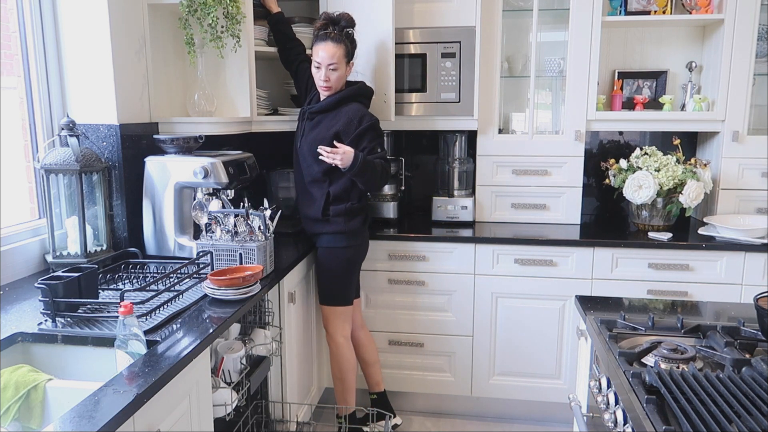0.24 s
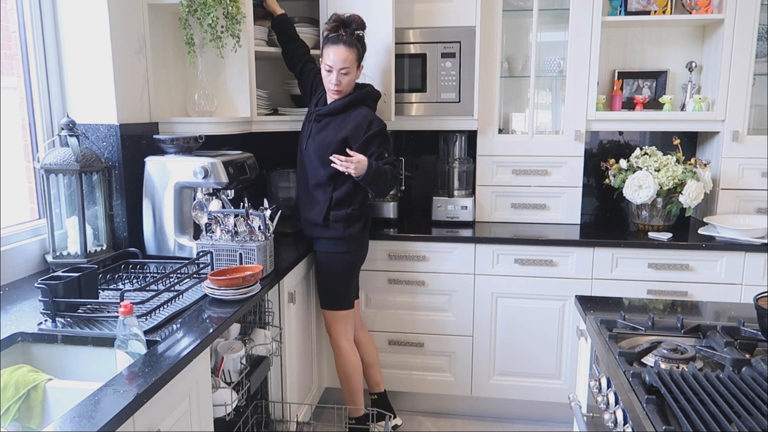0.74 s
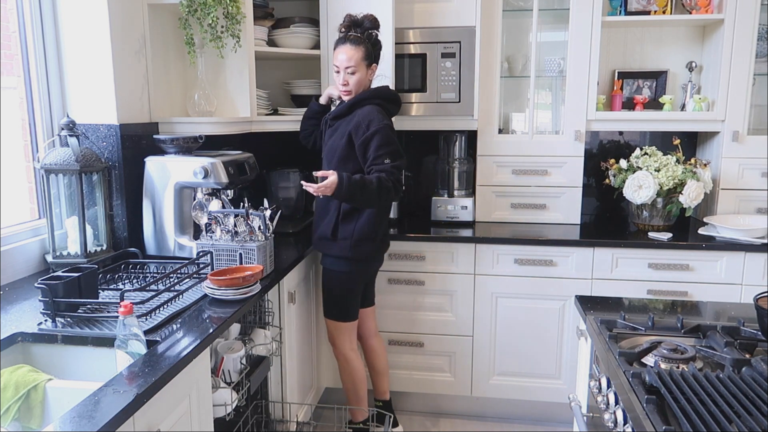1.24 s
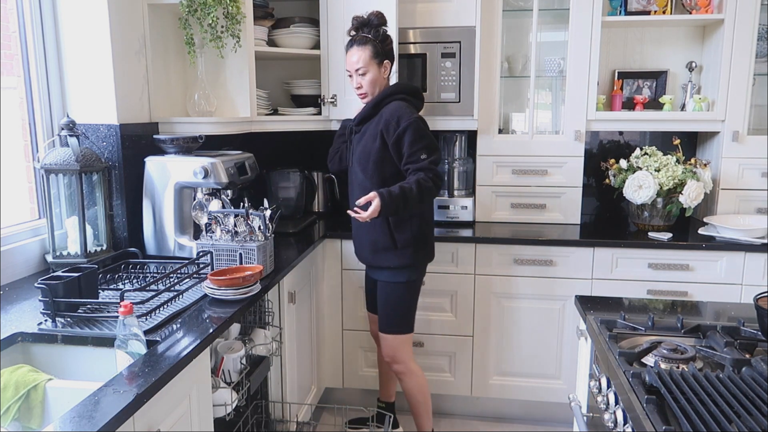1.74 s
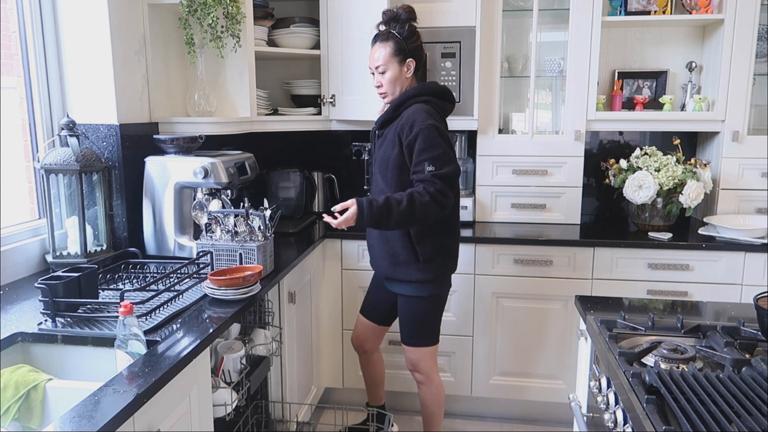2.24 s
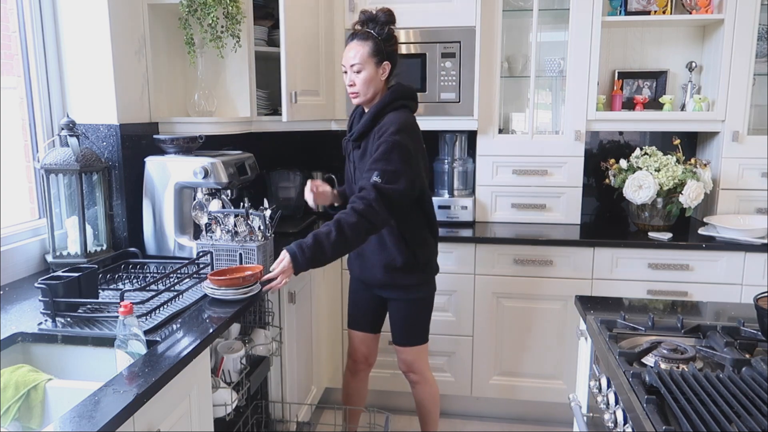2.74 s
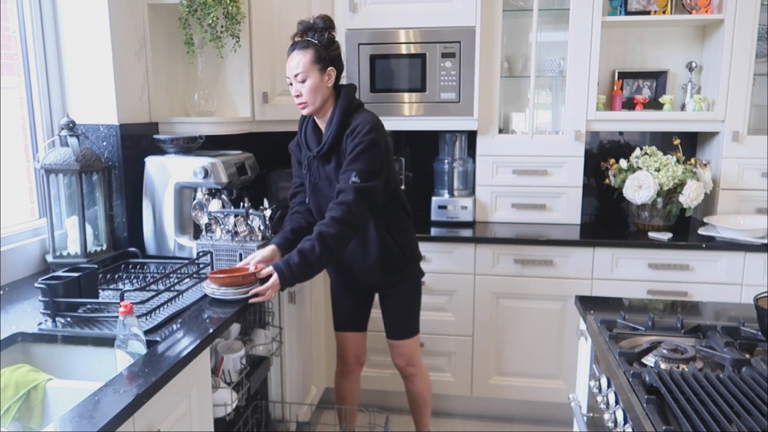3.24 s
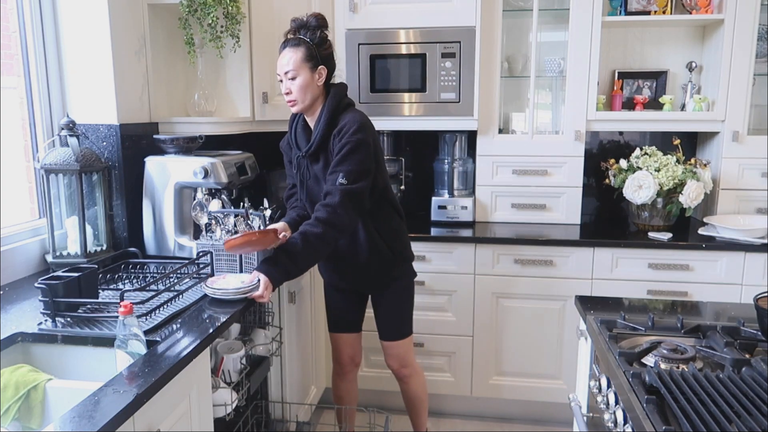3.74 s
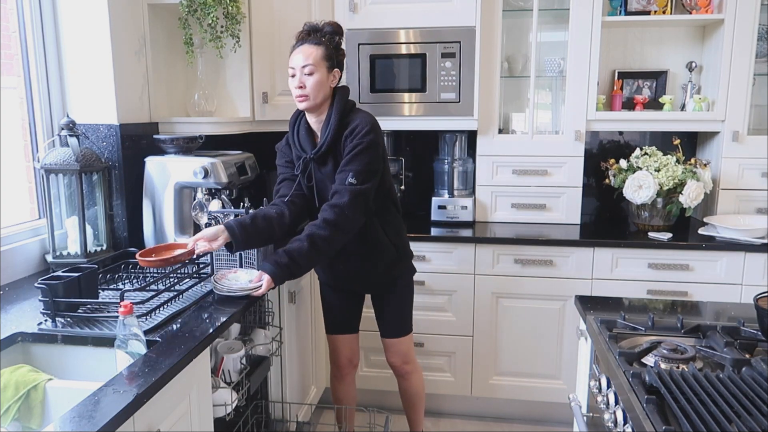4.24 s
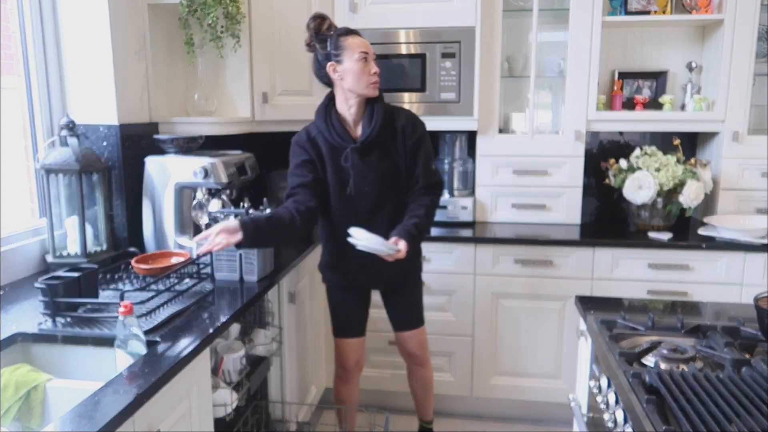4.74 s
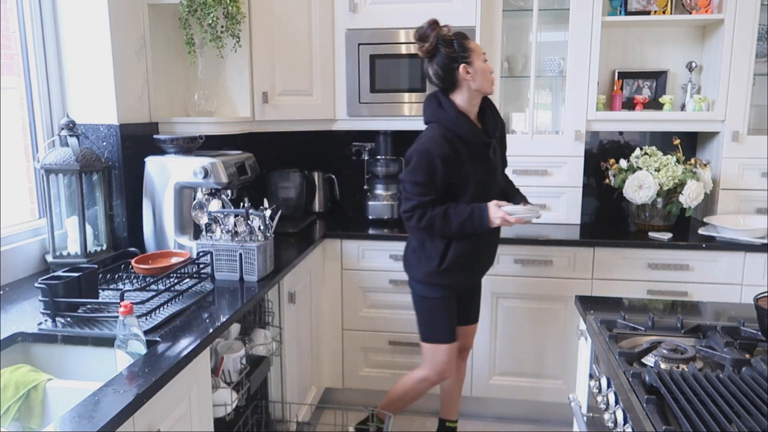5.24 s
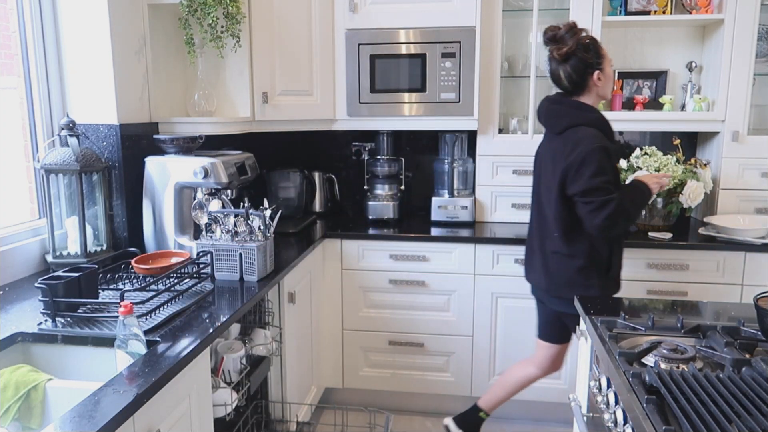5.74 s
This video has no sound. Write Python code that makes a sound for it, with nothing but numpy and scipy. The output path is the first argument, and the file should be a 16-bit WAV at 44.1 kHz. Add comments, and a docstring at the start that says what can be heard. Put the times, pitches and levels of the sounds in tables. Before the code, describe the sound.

Stereo microphone fixed in a kitchen: bright crockery clatter first, a pause, hollow wooden door knocks and a low counter thump, then a clay dish nudging and dragging over saucers before bouncing loudly in a rack. Lifted saucers clash, slide softly and jingle in short bursts with light footsteps. Short hard-room echo, quiet air and a wavering appliance hum.

```python
"""Crockery in a hard-walled kitchen

Dishes clash on a cupboard shelf, the door swings shut, a body bumps the counter, a clay dish is dragged off
saucers and set in a wire rack, and the saucers chatter as they are carried off. A hiss and a hum lie behind.
Each dish contact is a force (slide, strike, bounces) that clacks, rings modes and thuds in the support. Wood
uses the same model; door, clicks, bumps and hiss are filtered noise; the hum is a sum of sines."""
import sys
import numpy as np
from scipy import signal
from scipy.fft import rfft, irfft, next_fast_len
from scipy.io import wavfile
from scipy.ndimage import map_coordinates

SR = 44100
rng = np.random.default_rng(int(sys.argv[2]) if len(sys.argv) > 2 else 0)


def store_wav(level_fs):
    """Save 16-bit WAV to argv[1]."""
    pcm = np.round(np.clip(np.atleast_2d(level_fs), -1, 1) * 32767)
    wavfile.write(sys.argv[1], SR, pcm.T.astype(np.int16))


N = 264150
BLOW_S = np.arange(SR * 3 // 4) / SR  # time axis of one blow

# Edge: positive for a contact on the rim (more treble, shorter chatter), negative for a flat one.
CHATTER_HALVES_DB = 10  # this much more edge halves the chatter time
SLIP_SCATTER_DB = 6  # largest level offset of one slip of a rub
TOUCH_SCATTER_DB = 3  # rms; each point of contact brings out other partials
SHELF_DETUNE = 0.004  # relative pitch scatter; dishes that sit in a pile keep their pitch
SHELF_BOOM_DB = -32.5  # dishes are too light to make a cabinet boom
BOUNCE_GAP_S, GRIT_DB = 0.007, -10  # mean time between rim bounces; grinding between them
BEAT_HZ = 7  # mean beat rate of a split mode
SING_DB_PER_OCTAVE = 2  # a free rim favours its thin, high partials
NEAR_DB, NEAR_T60_S = 11, 0.04  # first echoes off the shelf or counter beside the dish
STEP_BOOM_DB, STEP_T60_S = -27, 0.28  # a soft shoe hardly stirs the deep bass
CLICK_DB, CLICK_PER_EDGE = -15, 0.2  # click in a knock; its growth with edge (dB per dB)

# Contact colour of pile and bowl. Each row: frequency in Hz, gain in dB.
BOWL_CLACK = [(88, -27), (150, -7), (350, -34.5), (505, -5.5), (636, -15.5), (866, 2.5), (1180, -6),
              (1350, -7), (1640, -2.5), (1910, -9), (2180, -5.5), (2550, 1), (2700, -17.5), (3340, 5.5),
              (3820, -22), (4540, -11.5), (5840, -34), (6300, -28.5), (10000, -43), (13100, -85.5),
              (15000, -72.5)]
# Contact colour of clay on saucers. Each row: frequency in Hz, gain in dB.
CLAY_CLACK = [(88, -43.5), (150, -12.5), (350, -9.5), (624, -8), (772, -15), (972, -3), (1200, -4.5),
              (1380, -1.5), (2230, -9), (2600, -9), (2810, -18.5), (3090, -10.5), (3470, -14),
              (3820, -14.5), (4210, -18), (9630, -41.5), (12100, -51), (12900, -74.5), (15000, -51)]
# Ringing of the wood. Each row: frequency in Hz, level in dB.
DOOR_MODES = [(540, -12), (760, 2), (1040, 6), (1250, 8.5), (1560, 2.5), (1760, 8), (2050, -12), (2450, 4)]
# Wooden knocks of the cupboard door. Each row: start in seconds, level in dB, edge in dB.
KNOCKS = [(1.695, -31.5, 7.5), (1.718, -35, -12), (1.732, -38, -3.5), (1.826, -33, 2), (1.843, -40.5, -3),
          (1.976, -51, -11), (2.43, -53, -5), (2.622, -37, 9.5), (2.959, -30, -4), (2.964, -30, -4)]


def amp(db):
    """Decibels to gain."""
    return 10 ** (np.asarray(db) / 20)


def unit(x):
    """x at rms 1."""
    return x / np.sqrt(np.mean(x ** 2) + 1e-20)


def blow(x):
    """x with the energy, per channel on average, of 0.01 s at rms 1."""
    return unit(x) * np.sqrt(SR / 100 / x.shape[-1])


def fade(t, t60_s):
    """Decay by 60 dB in t60_s."""
    return np.exp(-np.log(1000) * t / np.maximum(t60_s, 1e-3))


def along(points, hz):
    """Interpolate (Hz, value) points on a log frequency axis."""
    f, v = np.transpose(points)
    return np.interp(np.log(hz + 1), np.log(f + 1), v)


def above(hz, edge_hz):
    """Smooth step from 0 to 1 around edge_hz."""
    return hz ** 3 / (hz ** 3 + edge_hz ** 3)


def colour(x, level_db):
    """Causal minimum-phase filter whose gain in dB is level_db(Hz)."""
    m = 2 * next_fast_len(x.shape[-1] // 2 + 4096)
    gain = np.maximum(amp(level_db(np.fft.rfftfreq(m, 1 / SR))), 1e-6)
    cepstrum = irfft(np.log(gain), m)
    # fold the cepstrum to positive time
    cepstrum[1:m // 2] *= 2
    cepstrum[m // 2 + 1:] = 0
    return irfft(rfft(x, m) * np.exp(rfft(cepstrum)), m)[..., :x.shape[-1]]


def add(track, start_s, x):
    """Mix x into the track from start_s on."""
    start = round(start_s * SR)
    x = x[..., max(-start, 0):N - start]
    track[:, max(start, 0):][:, :x.shape[-1]] += x


def cupboard_pile():
    """The bowl grazes the pile on the shelf and grinds round in it; the glazed dishes ring."""
    # Grazes. Each row: start in seconds, level in dB, edge in dB.
    grazes = [(0.001, -16, 3.5), (0.011, -25, -2), (0.03, -16, -2.5), (0.159, -18.5, 1.5)]
    # Path of the grinding. Each row: time in seconds, level in dB, edge in dB.
    rub = [(0.07, -25.5, -8), (0.14, -26, -12.5), (0.19, -22, -1)]
    # Ringing. Each row: frequency in Hz, level in dB.
    modes = [(877.5, -44), (1007, -41), (1093, -43.5), (1351, -50.5), (1567, -51), (1852, -38), (1943, -36),
             (2428, -40.5), (2503, -46.5), (2896, -47.5), (3009, -38.5), (3332, -41), (3505, -58),
             (4522, -51), (5130, -50), (5545, -66), (6142, -60), (7041, -64)]
    return contacts(grazes + slips(rub, count=5), modes, BOWL_CLACK,
                    ring_db=4, ring_t60_s=0.089, detune=SHELF_DETUNE,
                    bounce_db=3.5, chatter_s=0.096, slide_db=-8, thinning=0.54, thud_db=-26,
                    early_db=1, direct_db=-0.5, sing_db=-3.5, sing_t60_s=0.35)


def bowl():
    """The bowl drops home, rings and settles."""
    # Drops. Each row: start in seconds, level in dB, edge in dB.
    drops = [(0.203, -14.5, -11.5), (0.211, -11, 2), (0.219, -15, 0.5), (0.24, -19.5, -7.5)]
    # Ringing. Each row: frequency in Hz, level in dB.
    modes = [(877.5, -40), (942.1, -42), (1001, -46), (1319, -31.5), (1567, -42), (1723, -52.5),
             (1866, -43), (2078, -50), (2455, -43), (2498, -43), (2912, -39), (3060, -57), (3284, -45.5),
             (3553, -42.5), (3817, -57), (4517, -52.5), (6228, -63), (6350, -61.5)]
    return contacts(drops, modes, BOWL_CLACK, ring_db=-2, ring_t60_s=0.046, detune=SHELF_DETUNE,
                    bounce_db=3, chatter_s=0.065, slide_db=-5, thinning=0.5, thud_db=-29.5,
                    early_db=6.5, direct_db=-8, sing_db=-5.5, sing_t60_s=0.65)


def plate():
    """A plate grazes its pile, touches down, drops flat and rings."""
    # Touches. Each row: start in seconds, level in dB, edge in dB.
    touches = [(0.736, -34.5, -13), (0.76, -20, -5), (0.77, -14.5, -5.5), (0.819, -8.5, 0),
               (0.828, -16.5, -1), (0.854, -20.5, -2.5)]
    # Ringing. Each row: frequency in Hz, level in dB.
    modes = [(829, -44), (1136, -47), (1314, -42), (1707, -48), (1873, -41), (2186, -42), (2225, -46),
             (2422, -47), (2498, -39), (2977, -43), (3106, -43), (3348, -51), (3510, -47), (4495, -52),
             (4764, -49.5), (5076, -53), (5582, -47.5), (6169, -52), (6352, -50.5), (7041, -54),
             (7105, -60)]
    # Contact colour. Each row: frequency in Hz, gain in dB.
    clack = [(88, -39), (150, -21), (343, -23), (433, -11.5), (687, -14.5), (883, -11), (1010, -13.5),
             (1320, -2.5), (1640, -8), (1840, -1), (2060, -7.5), (2550, 1.5), (2810, -13), (3090, 3.5),
             (4050, -19), (5000, -10.5), (5840, -33), (6300, -24), (9820, -42), (13400, -70), (15000, -56)]
    return contacts(touches, modes, clack, ring_db=-13, ring_t60_s=0.2, detune=SHELF_DETUNE,
                    bounce_db=4, chatter_s=0.03, slide_db=-15.5, thinning=1.7, thud_db=-23.5,
                    early_db=10, direct_db=-8, sing_db=-7, sing_t60_s=0.6)


def clay_tipping():
    """The clay dish tips up on its foot and nudges the saucers under it, which ring."""
    # Nudges. Each row: start in seconds, level in dB, edge in dB.
    nudges = [(3.328, -27, -5.5), (3.42, -17.5, -6), (3.427, -21, -6), (3.452, -15, -9),
              (3.466, -16.5, 0.5), (3.493, -15.5, -9), (3.497, -12, -3.5)]
    # Ringing of the saucers. Each row: frequency in Hz, level in dB.
    modes = [(1028, -30), (1200, -39), (1340, -24.5), (1464, -25.5), (1660, -28.5), (2099, -25),
             (2250, -39), (2492, -30), (3117, -34), (4081, -35.5), (4350, -43)]
    return contacts(nudges, modes, CLAY_CLACK, ring_db=1, ring_t60_s=0.11, detune=0.0091,
                    bounce_db=0, chatter_s=0.04, slide_db=-7, thinning=0.77, thud_db=-20.5,
                    early_db=8.5, direct_db=-16, sing_db=-7.5, sing_t60_s=0.17)


def clay_off_stack():
    """The clay dish drops onto its rim, rattles on the saucers and is dragged clear in small slips."""
    # Knocks on the saucers. Each row: start in seconds, level in dB, edge in dB.
    hits = [(3.505, -11, -1.5), (3.514, -17, -1), (3.528, -12.5, 0), (3.539, -15, 14.5), (3.549, -28.5, 10),
            (3.591, -17.5, 4.5), (3.603, -22.5, 5.5), (3.617, -22, 9.5), (3.659, -24, 3), (3.764, -25.5, 0),
            (3.841, -39, -3), (3.881, -27, -4.5), (3.897, -29, -4.5), (3.942, -29, -7)]
    # Path of the drag. Each row: time in seconds, level in dB, edge in dB.
    rub = [(3.63, -20, 4), (3.7, -21, -3), (3.77, -40, 2), (3.83, -31.5, -13), (3.89, -29.5, -1.5),
           (4.0, -31, 3)]
    # Ringing. Each row: frequency in Hz, level in dB.
    modes = [(1012, -35), (1324, -39), (1389, -35), (1529, -38.5), (1669, -37), (1906, -35.5), (2105, -40),
             (2353, -39), (2654, -36.5), (3036, -38.5), (3219, -42), (3736, -46.5), (3844, -44),
             (5000, -50), (5464, -49), (5800, -54.5), (7250, -60), (9168, -60.5)]
    return contacts(hits + slips(rub, count=10), modes, CLAY_CLACK,
                    ring_db=-2, ring_t60_s=0.11, detune=0.008,
                    bounce_db=0, chatter_s=0.055, slide_db=-13, thinning=0.6, thud_db=-17.5,
                    early_db=4, direct_db=-4, sing_db=-12, sing_t60_s=0.16)


def clay_in_rack():
    """The clay dish lands in the wire rack with bouncing, ringing blows."""
    # Landings. Each row: start in seconds, level in dB, edge in dB.
    landings = [(4.026, -18.5, -1), (4.066, -17, -5.5), (4.076, -13, -1.5), (4.094, -17.5, -10.5),
                (4.11, -8, 2), (4.13, -13, 6.5), (4.155, -13, 1.5), (4.204, -26, -2.5)]
    # Ringing. Each row: frequency in Hz, level in dB.
    modes = [(1109, -37.5), (1900, -33.5), (2083, -38.5), (2492, -28.5), (3079, -25.5), (3198, -41),
             (3478, -32), (4549, -46), (4732, -30), (5464, -37.5), (5556, -45), (6433, -53), (7348, -48.5),
             (9286, -50.5)]
    # Contact colour. Each row: frequency in Hz, gain in dB.
    clack = [(88, -55), (150, -25), (212, -31.5), (312, -13), (401, -21.5), (701, -12.5), (772, -13),
             (1070, 5.5), (1320, -2), (1670, 1.5), (2750, -10), (3090, -5.5), (4290, -5), (4720, -10),
             (9090, -27.5), (10000, -36), (12100, -27), (13600, -62.5), (15000, -43.5)]
    return contacts(landings, modes, clack, ring_db=-5, ring_t60_s=0.07, detune=0.0075,
                    bounce_db=3, chatter_s=0.075, slide_db=-11, thinning=0.95, thud_db=-36.5,
                    early_db=4.5, direct_db=-12, sing_db=-14.5, sing_t60_s=0.41)


def saucers_lifted():
    """The saucers slide together in the hand as they are lifted."""
    # Clashes. Each row: start in seconds, level in dB, edge in dB.
    clashes = [(4.302, -20.5, -2), (4.313, -11.5, 0.5), (4.338, -11.5, 6), (4.351, -18, -3.5),
               (4.539, -34, -19)]
    # Ringing. Each row: frequency in Hz, level in dB.
    modes = [(1335, -39.5), (1696, -35.5), (1997, -42), (2907, -54.5), (3020, -41), (3741, -40.5),
             (4204, -50.5), (4339, -60), (5076, -52), (7079, -55.5), (8349, -59), (8829, -85.5)]
    # Contact colour. Each row: frequency in Hz, gain in dB.
    clack = [(88, -79), (150, -40), (312, -37.5), (525, -22.5), (833, -10.5), (954, -8.5), (1540, -8),
             (1950, -1), (2550, -11.5), (2970, -3.5), (3470, -11.5), (3820, -9), (6680, -26), (7210, -26.5),
             (11900, -41), (13100, -59.5), (15000, -67)]
    return contacts(clashes, modes, clack, ring_db=-12.5, ring_t60_s=0.11, detune=0.0068,
                    bounce_db=1.5, chatter_s=0.03, slide_db=-13, thinning=0.88, thud_db=-55,
                    early_db=5.5, direct_db=-10, sing_db=-6.5, sing_t60_s=0.49)


def saucers_sliding():
    """Saucers slide and chatter softly in the hand."""
    # Slides. Each row: start in seconds, level in dB, edge in dB.
    slides = [(4.709, -38.5, 7), (4.75, -32.5, -1.5), (4.785, -36.5, 8.5), (4.8, -37, 10.5),
              (4.822, -29, -1.5), (4.871, -35, -6), (4.92, -41, -15), (5.07, -46.5, -25)]
    # Ringing. Each row: frequency in Hz, level in dB.
    modes = [(678, -11), (861, 5), (1039, -4.5), (1771, 6.5), (2099, -0.5), (3020, -5.5), (3117, 2.5),
             (3332, -0.5), (4075, -9.5), (4199, -7), (4377, -4.5), (5426, -9), (6670, -25)]
    # Contact colour. Each row: frequency in Hz, gain in dB.
    clack = [(150, -76), (250, -37), (675, 3.5), (1560, -4), (1790, -8), (2480, -9.5), (3050, -3),
             (4400, -11), (4900, -18), (6700, -29), (10100, -37), (15000, -66.5)]
    return contacts(slides, modes, clack, ring_db=1, ring_t60_s=0.11, detune=0.0051,
                    bounce_db=0.5, chatter_s=0.23, slide_db=-2.5, thinning=0.16, thud_db=-32,
                    early_db=5, direct_db=-8.5, sing_db=-15.5, sing_t60_s=0.55)


def saucers_carried():
    """The saucers jump and chatter in the hand as they are carried off."""
    # Jumps. Each row: start in seconds, level in dB, edge in dB.
    jumps = [(5.328, -47, -1), (5.379, -36, -5), (5.394, -26, 1.5), (5.406, -26, -2), (5.436, -27, 6),
             (5.638, -53, -12), (5.665, -24, 3.5), (5.696, -20.5, 1), (5.714, -26.5, -5),
             (5.742, -28.5, -6), (5.81, -32.5, -2), (5.913, -38, 0.5)]
    # Ringing. Each row: frequency in Hz, level in dB.
    modes = [(1109, -55.5), (1190, -54.5), (1427, -52.5), (1545, -56), (1916, -47.5), (2040, -45.5),
             (2175, -49), (2245, -54), (2503, -46), (3365, -62.5), (4021, -61), (4856, -65.5), (5755, -65)]
    # Contact colour. Each row: frequency in Hz, gain in dB.
    clack = [(88, -71), (150, -37), (378, -30), (459, -17.5), (1160, -3), (1770, -9), (1910, -9.5),
             (2500, -4.5), (2700, -14), (3400, -10), (3600, -15), (5840, -25), (6810, -28.5), (12100, -50),
             (15000, -77.5)]
    return contacts(jumps, modes, clack, ring_db=-1, ring_t60_s=0.065, detune=0.014,
                    bounce_db=4, chatter_s=0.054, slide_db=-10, thinning=1.2, thud_db=-49,
                    early_db=6, direct_db=-12.5, sing_db=-12, sing_t60_s=0.4)


def contacts(rows, modes, clack, ring_db, ring_t60_s, detune, bounce_db, chatter_s, slide_db, thinning,
             thud_db, early_db, direct_db, sing_db, sing_t60_s):
    """Slide, strike and bounces force a clack, modes and a support thud; the freed rim sings on."""
    track = np.zeros((2, N))
    lead = round(.03 * SR)
    t = BLOW_S[:SR // 3] - BLOW_S[lead]  # time from the strike
    ring_s = BLOW_S[:SR // 6]
    # each mode is a close pair
    hz, mode_db = np.transpose(np.repeat(modes, 2, axis=0))[:, :, None]
    # high modes die sooner; ring_t60_s holds at 2 kHz
    t60_s = ring_t60_s * np.sqrt(2000 / hz)
    decays = amp(mode_db) * fade(ring_s, t60_s) / np.sqrt(t60_s)
    free = partials(modes, sing_t60_s)
    for start_s, db, edge_db in rows:
        # a flat contact chatters longer than one on the rim
        chatter = chatter_s * 2 ** (-edge_db / CHATTER_HALVES_DB)
        slide = amp(slide_db) * grit((t < 0) * (t - t[0]))
        strike = blow(1. * (t == 0))
        force = slide + strike + amp(bounce_db) * rattle(t, chatter)

        # pitch shifts with where the dish is held and touched
        pitch = hz * (1 + detune * rng.standard_normal(hz.shape))
        waves = np.sin((2 * np.pi * pitch * ring_s).astype("f"))
        ring = rng.choice([-1, 1], len(hz)) @ (decays * waves)
        rung = blow(signal.fftconvolve(force, ring)[:len(t)])
        clacked = blow(colour(force, lambda f: along(clack, f)))
        hit = blow(clacked + amp(ring_db) * rung)
        hit = hit + amp(thud_db) * blow(cabinet(force, SHELF_BOOM_DB))

        # the more edge, the more treble and (by thinning) the less body
        tilt = lambda f: edge_db * (above(f, 4100) - thinning * (1 - above(f, 720)))
        heard = kitchen(colour(hit, tilt), direct_db, early_db)
        add(track, start_s - lead / SR, amp(db) * heard)

        # separate random phases in mid and side
        touch_db = TOUCH_SCATTER_DB * rng.standard_normal(len(free))
        phases = np.exp(2j * np.pi * rng.uniform(0, 1, (2, len(free))))
        struck = amp(tilt(hz[::2, 0]) + touch_db) * phases
        add(track, start_s, amp(db + sing_db) * blow((struck @ free).real))
    return track


def slips(rub, count):
    """A rub sticks and slips at uneven moments; each slip is a small blow."""
    s, db, edge_db = np.transpose(rub)
    scatter = rng.uniform(-1, 1, (count, 2))
    place = (np.arange(count) + .5 + .5 * scatter[:, 0]) / count
    times = s[0] + (s[-1] - s[0]) * place
    levels_db = np.interp(times, s, db) + SLIP_SCATTER_DB * scatter[:, 1]
    return list(zip(times, levels_db, np.interp(times, s, edge_db)))


def grit(envelope):
    """Spiky contact force of rough surfaces under an envelope."""
    noise = rng.standard_normal(len(envelope))
    return blow(noise * abs(noise) * envelope)


def rattle(t, chatter_s, count=24):
    """A rim bounces in separate, dying taps, with a little grinding between them."""
    times = np.cumsum(BOUNCE_GAP_S * rng.uniform(.4, 1.6, count))
    signs = rng.choice([-1., 1.], count)
    taps = np.bincount(np.searchsorted(t, times), signs, len(t))[:len(t)]
    dying = (t > 0) * fade(abs(t), chatter_s)
    return blow(blow(taps * dying) + amp(GRIT_DB) * grit(dying))


def partials(modes, t60_s):
    """Lasting ring of a free rim, a complex row per mode; each beats slowly and high ones die sooner."""
    hz, db = np.transpose(modes)[:, :, None]
    chance = rng.uniform(0, 1, (len(hz), 2))
    beat_cycles = BEAT_HZ * (.5 + chance[:, :1]) * BLOW_S + chance[:, 1:]
    beat = 1 + .5 * np.exp(2j * np.pi * beat_cycles)
    life_s = t60_s * (2000 / hz) ** .2
    level = amp(db + SING_DB_PER_OCTAVE * np.log2(hz / hz[0]))
    envelope = fade(BLOW_S, life_s) * (1 - fade(BLOW_S, 0.03))  # soft onset
    return level * envelope * beat * np.exp(2j * np.pi * hz * BLOW_S)


def cabinet(push, boom_db):
    """Dull answer of the cabinets to a push, boom_db setting the deep bass."""
    # Colour of a bump. Each row: frequency in Hz, gain in dB.
    bump_colour = [(20, -44), (38, -17), (57, 16.5), (80, 5.5), (110, -3), (140, 5), (180, -8), (245, -8.5),
                   (330, -12), (450, -16.5), (800, -24), (1500, -75.5)]
    return colour(push, lambda f: along(bump_colour, f) + boom_db * (1 - above(f, 120)))


def kitchen(x, direct_db, early_db, early_t60_s=0.24):
    """Mid and side of a blow: direct sound, near surfaces, dense cabinet echoes and the room's tail."""
    # Reverberation. Each row: frequency in Hz, T60 in seconds.
    room_t60 = [(60, 0.34), (200, 0.87), (600, 0.98), (1400, 0.9), (3500, 0.75), (7000, 0.67),
                (13000, 0.044)]
    hz, t, z = signal.stft(rng.standard_normal((2, len(BLOW_S))), SR, nperseg=256)
    near = amp(NEAR_DB) * fade(t, NEAR_T60_S)
    echoes = np.hypot(near, amp(early_db) * fade(t, early_t60_s))
    decay = np.hypot(fade(t, along(room_t60, hz)[:, None]), echoes)
    paths = signal.istft(z * decay, SR, nperseg=256)[1][:, :len(BLOW_S)]
    paths /= np.linalg.norm(paths[0])
    paths[0, 0] += amp(direct_db)  # direct sound in the mid only
    return signal.fftconvolve(x[None], paths, axes=1)[:, :len(BLOW_S)]


def door_knocks():
    """Short, hollow wooden knocks of the cupboard door."""
    # Contact colour. Each row: frequency in Hz, gain in dB.
    clack = [(71, -34), (120, -9), (387, -8), (569, -1), (629, -1.5), (961, -6), (1020, -9), (1130, -1.5),
             (1690, -2), (5350, -19), (15000, -66)]
    return contacts(KNOCKS, DOOR_MODES, clack, ring_db=-2, ring_t60_s=0.022, detune=0.024,
                    bounce_db=0, chatter_s=0.029, slide_db=-18, thinning=0.42, thud_db=-31,
                    early_db=6, direct_db=-8.5, sing_db=-13, sing_t60_s=0.25)


def counter_jolts():
    """The body meets the counter's edge and the wooden fronts clack."""
    # Jolts. Each row: start in seconds, level in dB, edge in dB.
    jolts = [(3.137, -25, 7), (3.145, -30.5, 14.5), (3.162, -25, -5.5), (3.21, -29, 0)]
    # Contact colour. Each row: frequency in Hz, gain in dB.
    clack = [(150, -41.5), (250, -4), (433, -21.5), (609, -6), (1110, -9.5), (1270, -14.5), (2060, -10),
             (10300, -52), (15000, -106)]
    return contacts(jolts, DOOR_MODES, clack, ring_db=-21, ring_t60_s=0.025, detune=0.021,
                    bounce_db=6, chatter_s=0.041, slide_db=-26.5, thinning=0.34, thud_db=-22,
                    early_db=-2.5, direct_db=-10.5, sing_db=-9.5, sing_t60_s=0.3)


def door_panel(t60_s=0.012):
    """The door panel thuds, dull and hollow, as it is pushed, shuts and rebounds."""
    # Thuds. Each row: start in seconds, level in dB.
    shuts = [(1.828, -55), (1.866, -51), (2.966, -30.5), (2.992, -31.5)]
    # Colour of the panel. Each row: frequency in Hz, gain in dB.
    panel = [(200, -38.5), (400, -14.5), (540, 15.5), (640, -8), (850, -2), (2000, -55.5)]
    track = np.zeros((2, N))
    for start_s, db in shuts:
        push = rng.standard_normal(len(BLOW_S)) * fade(BLOW_S, t60_s)
        thud = colour(push, lambda f: along(panel, f))
        add(track, start_s, amp(db) * blow(kitchen(thud, direct_db=0.5, early_db=20.5)))
    return track


def clicks():
    """Every door knock brings a click; hinge, counter and gripped dish tick on notes of their own."""
    # Hinge spring as the door folds in. Each row: start in seconds, level in dB.
    hinge = [(2.622, -46.5), (2.653, -37.5), (2.692, -38)]
    # Crack of the jolted counter front. Each row: start in seconds, level in dB.
    crack = [(3.1445, -30)]
    # Click as the clay dish is gripped. Each row: start in seconds, level in dB.
    grip = [(3.3695, -41.5)]
    snaps = [(s, db + CLICK_DB + CLICK_PER_EDGE * edge_db) for s, db, edge_db in KNOCKS]
    return (ticks(snaps, t60_s=0.033, centre_hz=1900, octaves=0.3, direct_db=-3.5)
            + ticks(hinge, t60_s=0.02, centre_hz=2070, octaves=0.19, direct_db=-4)
            + ticks(crack, t60_s=0.026, centre_hz=2580, octaves=0.36, direct_db=4.5)
            + ticks(grip, t60_s=0.012, centre_hz=4500, octaves=0.3, direct_db=-9.5))


def ticks(rows, t60_s, centre_hz, octaves, direct_db):
    """Tiny hard contacts, pitched by the small part that snaps, and over almost at once."""
    track = np.zeros((2, N))
    band = lambda f: -10 * np.log10(1 + (np.log2((f + 1) / centre_hz) / octaves) ** 4)
    for start_s, db in rows:
        tick = blow(colour(grit(fade(BLOW_S, t60_s)), band))
        add(track, start_s, amp(db) * blow(kitchen(tick, direct_db, early_db=9)))
    return track


def thumps(ring_db=-3):
    """Soft bumps and steps shake the cabinets and floor; some bumps make the hollow base unit boom."""
    # Bumps on the cabinets. Each row: start in seconds, level in dB, boom in dB, T60 in seconds.
    bumps = [(1.825, -36, -19, 0.18), (2.692, -37, -32, 0.14), (2.713, -37, -22, 0.2),
             (2.966, -28.5, -10, 0.75), (3.14, -19.5, 0.5, 0.077), (3.161, -17, -17.5, 0.19),
             (3.196, -24.5, -0.5, 0.13), (3.377, -23, -14, 0.29)]
    # Footfalls. Each row: start in seconds, level in dB.
    footfalls = [(0.468, -35.5), (0.61, -39.5), (1.9, -53), (2.119, -50), (4.553, -48.5), (5.133, -46),
                 (5.744, -36.5), (5.87, -42.5)]
    # Modes of the base unit. Each row: frequency in Hz, level in dB, T60 in seconds.
    modes = [(57, 2, 0.33), (142, -5, 0.2)]
    track = np.zeros((2, N))
    ring = sum(amp(db) * fade(BLOW_S, t60_s) * np.sin(2 * np.pi * hz * BLOW_S)
               for hz, db, t60_s in modes)
    steps = [(s, db, STEP_BOOM_DB, STEP_T60_S) for s, db in footfalls]
    for start_s, db, boom_db, t60_s in bumps + steps:
        push = rng.standard_normal(len(BLOW_S)) * fade(BLOW_S, t60_s)
        heard = kitchen(cabinet(push, boom_db), direct_db=1, early_db=2.5)
        add(track, start_s, amp(db) * np.sqrt(2) * blow(heard))
        add(track, start_s, amp(db + boom_db + ring_db) * ring)
    return track


def background(hum_db=-2, waver_db=4):
    """A steady, wide hiss (coloured noise) and an appliance's wavering hum; both dip around 4.4 s."""
    # Colour of the hiss. Each row: frequency in Hz, gain in dB.
    hiss_colour = [(12, -43), (20, -7.5), (92, -8), (289, -8), (393, -8.5), (519, -15), (597, -16),
                   (881, -19.5), (1490, -19), (2030, -22), (2330, -18.5), (11100, -41.5), (15500, -62)]
    # Level of the hiss. Each row: time in seconds, level in dB.
    hiss_level = [(0, -52), (1.5, -52), (2.6, -51.5), (3.9, -57), (4.4, -65.5), (5.25, -59), (5.6, -57),
                  (6, -53)]
    # Partials of the hum. Each row: frequency in Hz, level in dB before hum_db.
    hum_partials = [(102.3, -57), (150.7, -63.5), (199.2, -69.5), (393.0, -76)]
    t = np.arange(N) / SR
    level_db = np.interp(t, *np.transpose(hiss_level))
    hiss = unit(colour(rng.standard_normal((2, N)), lambda f: along(hiss_colour, f)))
    # slow random curve through 40 points
    wobble = lambda: map_coordinates(rng.standard_normal(40), [np.linspace(0, 39, N)])
    hum = np.zeros(N)
    for hz, db in hum_partials:
        strength = np.sqrt(2) * amp(db + waver_db * wobble())
        hum += strength * np.sin(2 * np.pi * hz * t + 0.35 * wobble())
    return amp(level_db) * hiss + amp(level_db - level_db.max() + hum_db) * hum


def spread(mid_side, width):
    """Left and right from mid and side, the side's level set per frequency by width."""
    mid, side = mid_side
    side = colour(side, lambda f: along(width, f))
    return np.array([mid + side, mid - side])


def scene():
    """The blows come from straight ahead; the background is wide, differing between left and right."""
    # Width of the blows. Each row: frequency in Hz, side gain in dB.
    blow_width = [(50, -52), (125, -48.5), (260, -28.5), (500, -20), (1000, -19.5), (2000, -17), (3600, -9),
                  (6300, -0.5), (10000, 7), (13000, 13.5)]
    # Width of the background. Each row: frequency in Hz, side gain in dB.
    air_width = [(50, -22.5), (125, -12), (260, 1), (1000, 4), (3000, -1.5), (10000, 4)]
    shelf = cupboard_pile() + bowl() + plate()
    clay = clay_tipping() + clay_off_stack() + clay_in_rack()
    saucers = saucers_lifted() + saucers_sliding() + saucers_carried()
    wood = door_knocks() + counter_jolts() + door_panel()
    blows = shelf + clay + saucers + wood + clicks() + thumps()
    balance = amp([[.15], [-.15]])  # left a touch louder
    return spread(blows, blow_width) * balance + spread(background(), air_width)


def record(dry, ceiling=1.0, top_hz=15150):
    """Round off the highest peaks, dull the treble above 12 kHz and cut all from top_hz up."""
    held = dry / (1 + np.abs(dry / ceiling) ** 10) ** (1 / 10)
    dulled = colour(held, lambda f: along([(12000, -0.5), (13200, -8), (15000, -6.5)], f))
    m = next_fast_len(N + SR // 2)
    passed = np.fft.rfftfreq(m, 1 / SR) < top_hz
    return irfft(rfft(dulled, m) * passed, m)[:, :N]


dry = scene()
out = record(dry)
store_wav(out)
```